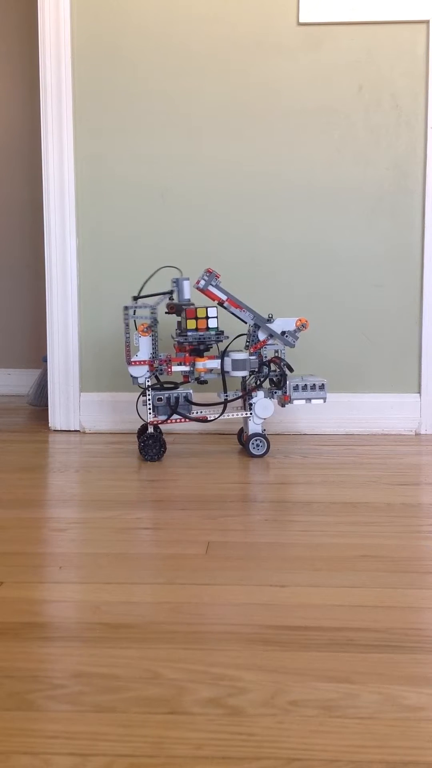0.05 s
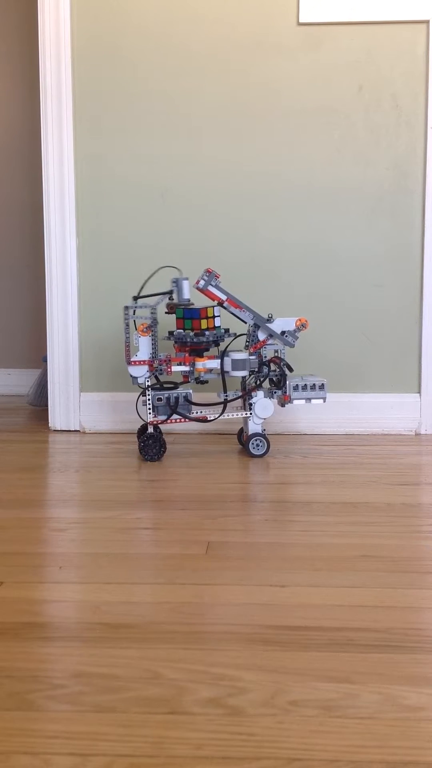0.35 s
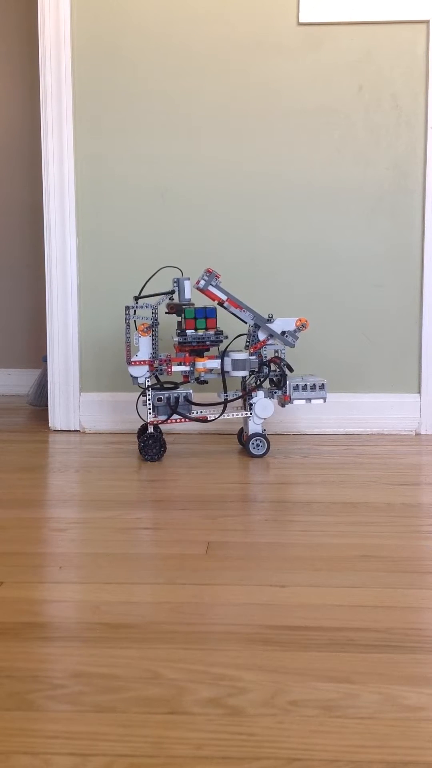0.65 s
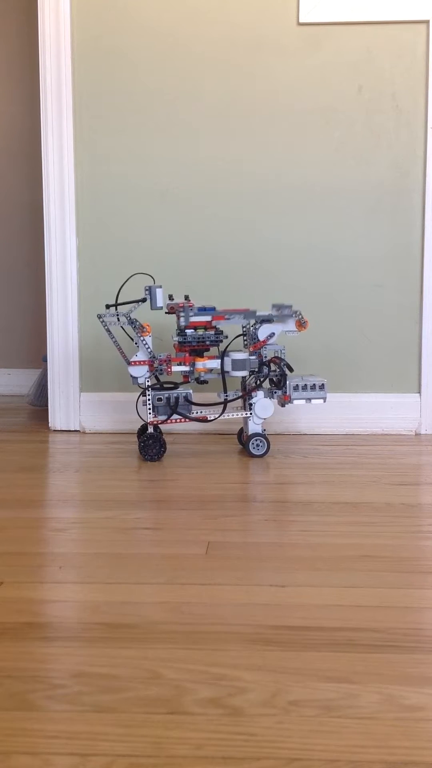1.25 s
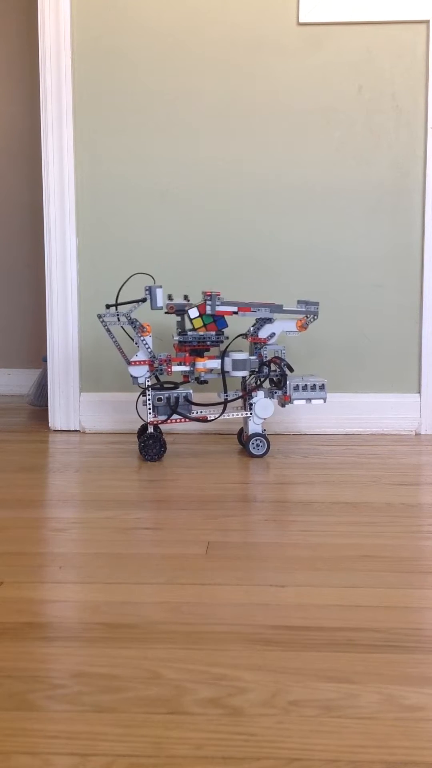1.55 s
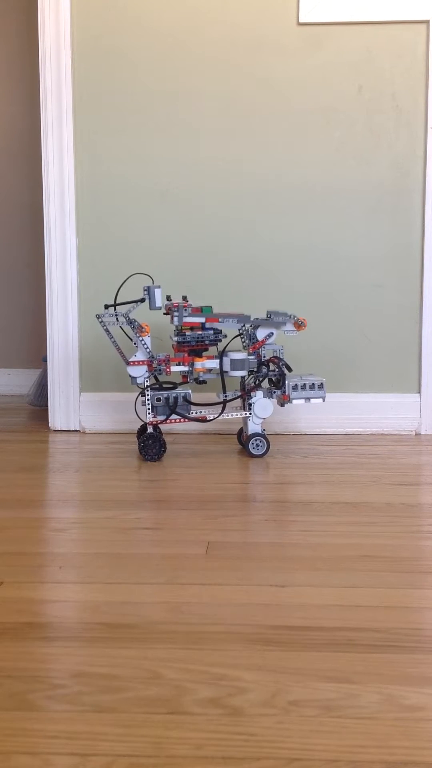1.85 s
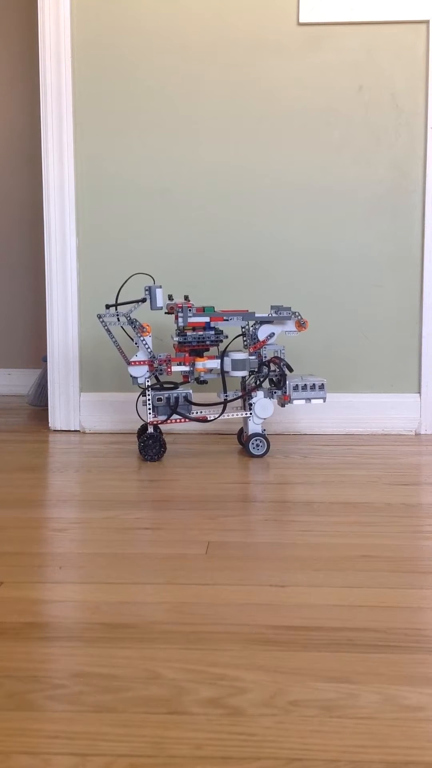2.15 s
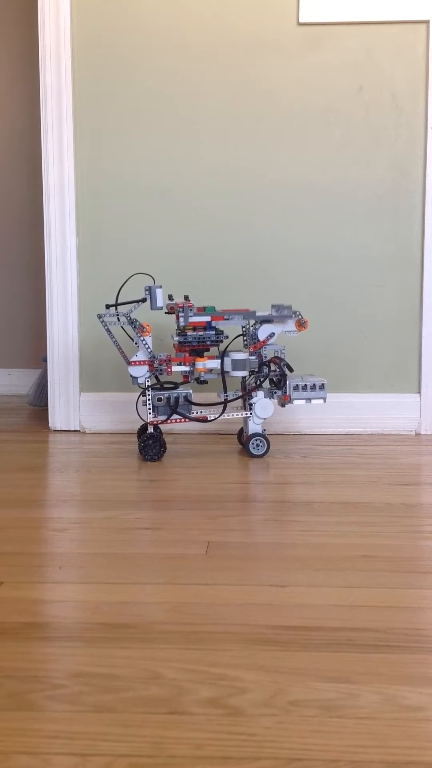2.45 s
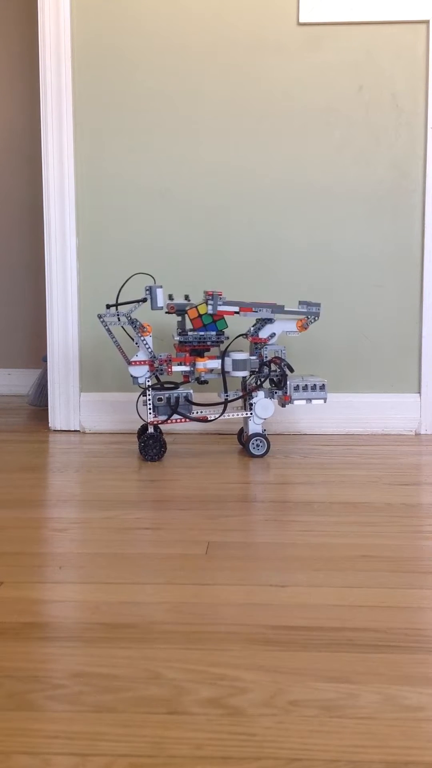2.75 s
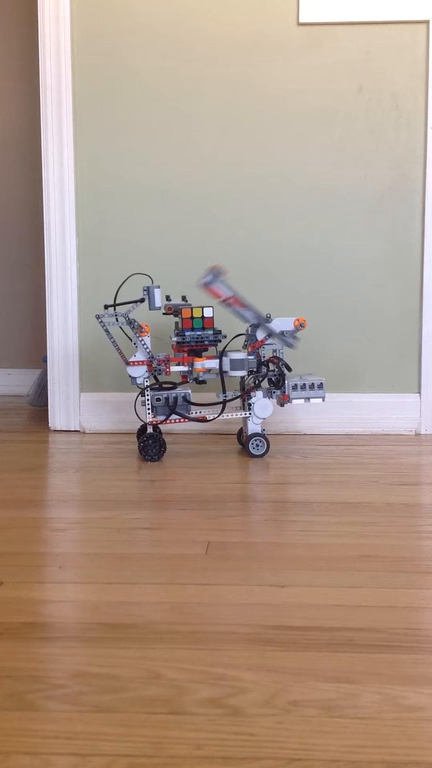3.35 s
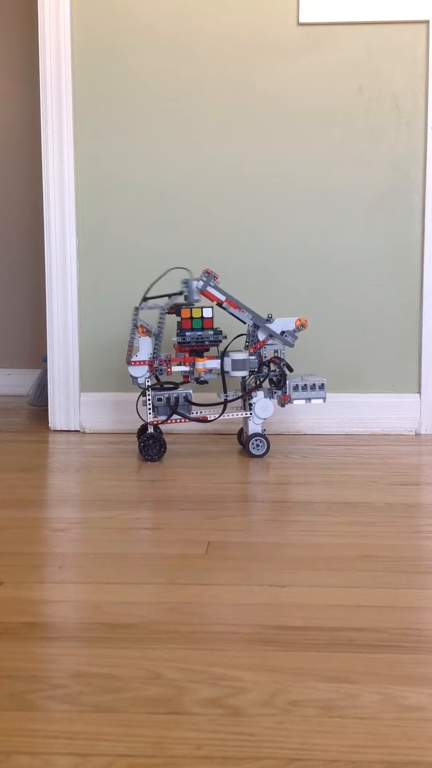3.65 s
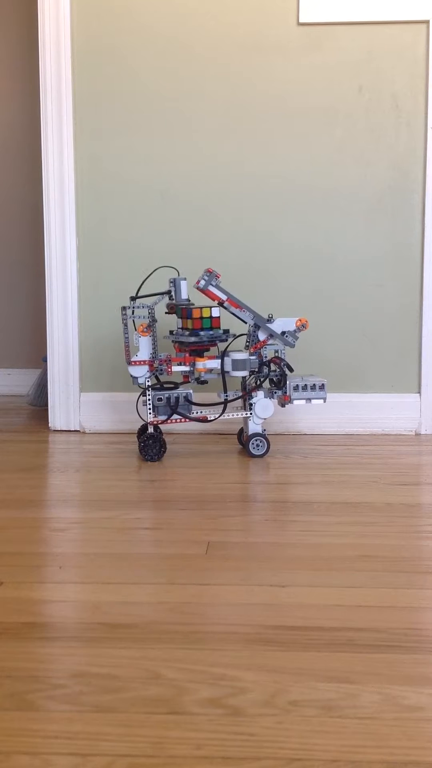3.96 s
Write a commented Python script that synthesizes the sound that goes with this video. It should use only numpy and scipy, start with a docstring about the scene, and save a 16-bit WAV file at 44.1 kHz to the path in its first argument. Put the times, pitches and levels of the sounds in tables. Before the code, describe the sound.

A toy robot's small motors and plastic gears rasp and whir in short bursts from the start. Near 0.9 seconds its arm clacks sharply onto a puzzle cube, followed by light ticks and more whirring. After a pause from 2 to 2.5 seconds, the bursts return with lighter knocks. Faint high squeaks join around 3.5 seconds, then one last whir. The slightly echoing room hums quietly underneath.

```python
"""A toy-brick robot handles a puzzle cube on the wooden floor of a bare, humming room.
First its turntable turns: a small motor speeds up and brakes, and plastic gear teeth rasp and whine.
From 0.7 s a second motor tilts the arm, which clacks down on the cube; loose parts tick.
After a pause at 2 s the arm moves and knocks again. Near 3.5 s a third motor moves the sensor arm
on its squeaky axle, and at the end the turntable starts once more."""
import sys
import numpy as np
from scipy import signal
from scipy.fft import rfft, irfft, next_fast_len
from scipy.io import wavfile

SR = 44100
rng = np.random.default_rng(int(sys.argv[2]) if len(sys.argv) > 2 else 0)


def unload_wav(signal):
    """Save mono or channel-first audio to the path in sys.argv[1] as 16-bit WAV at rate SR, clipped to [-1, 1]."""
    wavfile.write(
        sys.argv[1],
        SR,
        np.round(np.clip(np.atleast_2d(signal).T, -1, 1) * 32767).astype(np.int16),
    )


N = 176400

# the room's steady rush: f/Hz, relative level/dB
RUSH_SPECTRUM = [(30, -34), (55, -37), (90, -16.5), (112, -6.5), (155, -.5), (200, -1), (250, 0), (300, -5),
                 (390, -5.5), (520, -10.5), (800, -13), (1550, -24), (4000, -30), (15500, -32)]
# how long the room's echo takes to fade by 60 dB: f/Hz, fade time/s
ECHO_FADE = [(500, 0.78), (3000, 0.6), (7000, 0.52), (14000, 0.29)]
# squeaks of the sensor arm's axle: t/s, length/s, level/dB, f/Hz
AXLE_SQUEAKS = [(3.504, 0.038, -39.5, 12150), (3.563, 0.051, -39, 14200), (3.678, 0.039, -43, 12250)]
# plastic knocks of arm and cube: t/s, level/dB, ring f/Hz, ring level relative to the knock/dB
KNOCKS = [(0.9371, -13.5, 5700, -13), (.9392, -12.5, 7800, -12), (0.946, -17, 13500, -6),
          (0.9515, -23, 5240, -19), (0.9604, -19, 5430, -11), (0.9702, -25, 13200, -8),
          (.980, -30, 10300, -9), (.8096, -24, 12400, -12), (1.0855, -30, 10800, -15.5),
          (1.119, -34, 7650, -23), (1.487, -30.5, 12040, -1.5), (2.560, -20, 10600, -12),
          (2.6977, -24, 12700, -12), (3.0145, -22, 8400, -14), (3.1098, -30.5, 5600, -4)]
# tone colour of the knocks: f/Hz, relative level/dB
KNOCK_SPECTRUM = [(100, -41), (500, -10), (1500, -6.5), (3000, -3), (5500, 2.5), (9500, 2.5), (13000, 6),
                  (15500, -4)]
# moves of each motor: t/s, spin-up/s, hold/s, braking/s, rasp level/dB, whine level/dB,
# tooth rate at full speed/Hz, treble boost/dB
TURNTABLE_RUNS = [(-.2, 0.086, 0.099, .07, -41, -62, 830, -1),
                  (.097, .015, .015, 0.055, -42.5, -61, 782, 0),
                  (.11, 0.11, 0.081, .07, -38.5, -53.5, 842.7, 2.5),
                  (.39, .1, .13, 0.078, -40.5, -58.5, 844, 2),
                  (3.81, 0.087, 0.14, .08, -38.5, -62, 833, 0.5)]
ARM_RUNS = [(.73, 0.073, 0.068, 0.12, -36, -61, 901, -5), (1.295, 0.074, 0.051, .17, -39.5, -46.5, 757, -3),
            (1.645, 0.057, .02, 0.058, -36, -55.5, 710, 0), (1.76, 0.045, 0.018, 0.05, -32.5, -65, 940, -2),
            (1.85, 0.043, .025, 0.06, -41, -68, 920, -2.5), (2.505, 0.076, 0.056, 0.15, -40, -48, 751, -6),
            (2.77, 0.042, 0.032, 0.06, -53.5, -79, 716, -4),
            (2.865, 0.046, 0.023, .07, -37.5, -59, 743, -3),
            (2.985, 0.034, 0.008, 0.073, -32.5, -42, 915, 1),
            (3.06, 0.046, 0.034, 0.087, -43, -59, 892, -4), (3.235, 0.091, 0.059, 0.039, -32, -49, 841, 1)]
SENSOR_RUNS = [(3.455, 0.067, .035, 0.069, -39.5, -50.5, 764, 0.11),
               (3.53, .08, .16, 0.033, -42, -55, 934, -0.66)]
# tone colour that each set of gears gives its tooth strikes: f/Hz, relative level/dB
TURNTABLE_SPECTRUM = [(100, -55), (500, -11), (1000, -16), (1400, -2.5), (1950, -10), (2500, -0.5),
                      (3500, -8), (5500, -2), (10500, -5), (13800, -2), (15500, -3.5)]
ARM_SPECTRUM = [(100, -44), (500, -15.5), (1000, -15.5), (1400, -8), (2100, -7.5), (3200, -6), (6000, -2),
                (8500, -4.5), (10500, -1), (12700, -3), (15500, -1.5)]
SENSOR_SPECTRUM = [(100, -53), (1000, -18), (1600, -5), (4000, -5.5), (7000, -4), (10800, -5),
                   (12200, -5.5), (13000, -2), (14200, -3), (15500, -3.5)]
# tones in the whine of each set of gears: multiple of the tooth rate, relative level/dB
TURNTABLE_TONES = [(2, 3.5), (3, 5.5), (6, 0)]
ARM_TONES = [(2, -2.5), (3, -6.5), (4, -3.5), (5, -5), (7, -8)]
SENSOR_TONES = [(2, 2.5), (3, -2.5), (8, 3)]

RUSH_DB, HUM_DB, HUM_HZ = -54.5, -64.5, 122.9
RASP_ECHO_DB, TONE_ECHO_DB, KNOCK_ECHO_DB = -3.5, -5.5, -1.5
CRACK_FADE_S, RING_FADE_S = 0.0089, 0.018  # time to fade by 60 dB
START_PITCH, BRAKE_SAG = 0.76, 0.1  # shares of the full-speed pitch
SPEED_WOBBLE, SQUEAK_WOBBLE = 0.01, 0.0092  # shares by which the pitch wanders
TOOTH_SPREAD_DB, TOOTH_RING_S = 3.5, 0.00076
CHATTER_DB, CHATTER_HZ = 0.94, 70.4  # quick flutter in a motor's loudness
RASP_POWER, WHINE_POWER, WHINE_BRAKE_POWER = 0.77, 2, 4.3  # higher: swells later, fades sooner
PATCH_DB, PATCH_WIDTH_HZ, PATCH_S = 2.5, 430, 0.029  # depth, width and length of gear resonances


def from_db(db):
    """Turn decibels into a factor to multiply by."""
    return 10 ** (np.asarray(db) / 20)


def rms_one(x):
    """Scale a signal so that its average power is one."""
    return x / np.sqrt(np.mean(x ** 2) + 1e-20)


def at_hz(points, hz):
    """Read between a table's rows, with every octave equally wide."""
    f, value = np.transpose(points)
    return np.interp(np.log(np.maximum(hz, 1)), np.log(f), value)


def colour(x, spectrum):
    """Give a signal a tone colour; white noise keeps its power."""
    size = next_fast_len(len(x) + SR // 10)
    gain = rms_one(from_db(at_hz(spectrum, np.fft.rfftfreq(size, 1 / SR))))
    return irfft(rfft(x, size) * gain, size)[:len(x)]


def drift(rate_hz, size):
    """A smooth random wobble with a typical size of one."""
    r, run_in = np.exp(-2 * np.pi * rate_hz / SR), SR // 10
    smooth = signal.lfilter([1], [1, -2 * r, r * r], rng.standard_normal(size + run_in))
    return rms_one(smooth[run_in:])


def add(out, start, x):
    """Mix a sound in at a start time in seconds."""
    i = int(start * SR)
    x = x[max(-i, 0):N - i]
    out[max(i, 0):max(i, 0) + len(x)] += x


def room_tone():
    """The background: a low, steady rush and the hum of mains power."""
    rush = colour(rng.standard_normal(N), RUSH_SPECTRUM)
    hum = np.sqrt(2) * np.sin(2 * np.pi * HUM_HZ * np.arange(N) / SR)
    return from_db(RUSH_DB) * rush + from_db(HUM_DB) * hum


def room_echo(build_up_s=0.0013):
    """The room's answer to a click, different for each position of the source; treble dies first."""
    t, tail = np.arange(SR * 2 // 3) / SR, 0
    noise, edges_hz = rng.standard_normal((2, len(t))), np.geomspace(200, 18000, 11)
    for k, (low, high) in enumerate(zip(edges_hz, edges_hz[1:])):
        band = signal.sosfilt(signal.butter(2, [low, high], "band", fs=SR, output="sos"), noise[k % 2])
        tail = tail + band * from_db(-60 * t / at_hz(ECHO_FADE, np.sqrt(low * high)))
    tail = tail * (1 - np.exp(-t / build_up_s))
    return tail / np.sqrt(np.sum(tail ** 2))


def squeaks():
    """A dry axle sings briefly on a high, unsteady tone."""
    out, t = np.zeros(N), np.arange(SR // 10) / SR
    for start, length, db, hz in AXLE_SQUEAKS:
        cycles = np.cumsum(hz * (1 + SQUEAK_WOBBLE * drift(rate_hz=80, size=len(t)))) / SR
        swell = np.sin(np.pi * np.minimum(t / length, 1))
        add(out, start, from_db(db) * swell * np.sin(2 * np.pi * cycles))
    return out + from_db(TONE_ECHO_DB) * signal.fftconvolve(out, room_echo())[:N]


def knocks():
    """The brick frame gives a sharp crack that echoes, and the part that was hit rings briefly."""
    out, t = np.zeros(N), np.arange(SR // 10) / SR
    for start, db, ring_hz, ring_db in KNOCKS:
        crack = rng.standard_normal(len(t)) * from_db(db - 60 * t / CRACK_FADE_S) / 2
        ring = np.sin(2 * np.pi * ring_hz * t) * from_db(db + ring_db - 60 * t / RING_FADE_S)
        add(out, start, crack + ring)
        add(out, start, from_db(KNOCK_ECHO_DB) * np.sqrt(np.sum(crack ** 2)) * room_echo())
    return colour(out, KNOCK_SPECTRUM)


def gear_resonances(x, size=256):
    """Narrow bands of the sound swell and fade at random as the contact moves round the gears."""
    _, _, frames = signal.stft(x, SR, nperseg=size)
    patches = rng.standard_normal(frames.shape)
    # smooth the random patches across frequency, then across time
    for axis, steps in enumerate((PATCH_WIDTH_HZ * size / SR, PATCH_S * SR / (size / 2))):
        r = np.exp(-2 / steps)
        patches = signal.lfilter([1], [1, -2 * r, r * r], patches, axis=axis)
    _, shaped = signal.istft(frames * from_db(PATCH_DB * rms_one(patches)), SR, nperseg=size)
    return rms_one(shaped[:len(x)])


def motor(moves, spectrum, tones):
    """Gear teeth strike unevenly, hiss as they slide, and whine; the pitch climbs until braking."""
    t, out = np.arange(SR // 2) / SR, np.zeros(N)
    for start, spin_up, hold, braking, rasp_db, whine_db, tooth_hz, treble_db in moves:
        climb = np.sin(np.clip(t / (spin_up + hold), 0, 1) * np.pi / 2)
        brake = np.clip((t - spin_up - hold) / braking, 0, 1)
        drive = np.minimum(t / spin_up, 1 - brake)
        pitch = tooth_hz * (START_PITCH + (1 - START_PITCH) * climb - BRAKE_SAG * brake)
        teeth_passed = np.cumsum(pitch * (1 + SPEED_WOBBLE * drift(rate_hz=40, size=len(t)))) / SR
        tooth = teeth_passed.astype(int)
        since_strike_s = (teeth_passed - tooth) / pitch
        strength = from_db(TOOTH_SPREAD_DB * rng.standard_normal(len(t)))[tooth]
        strikes = rms_one(strength * np.exp(-since_strike_s / TOOTH_RING_S))
        scrape = rms_one((strikes + 1) * rng.standard_normal(len(t)))  # the 1 is the sliding hiss
        scrape = colour(gear_resonances(scrape), spectrum)
        scrape = colour(scrape, [(11300, 0), (13300, treble_db)])  # each move has its own brightness
        gear_tone = rms_one(sum(from_db(db) * np.sin(2 * np.pi * k * teeth_passed) for k, db in tones))
        chatter_db = CHATTER_DB * drift(CHATTER_HZ, size=len(t))
        rasp = from_db(rasp_db + chatter_db) * drive ** RASP_POWER * scrape
        whine_swell = np.minimum(t / spin_up, 1) ** WHINE_POWER * (1 - brake) ** WHINE_BRAKE_POWER
        whine = from_db(whine_db + chatter_db) * whine_swell * gear_tone
        into_room = from_db(RASP_ECHO_DB) * rasp + from_db(TONE_ECHO_DB) * whine
        add(out, start, rasp + whine)
        add(out, start, signal.fftconvolve(into_room, room_echo()))
    return out


def scene():
    """Three motors, knocks, squeaks and the room's own sound, mixed into one channel."""
    turntable = motor(TURNTABLE_RUNS, TURNTABLE_SPECTRUM, TURNTABLE_TONES)
    arm = motor(ARM_RUNS, ARM_SPECTRUM, ARM_TONES)
    sensor_arm = motor(SENSOR_RUNS, SENSOR_SPECTRUM, SENSOR_TONES)
    return (turntable + arm + sensor_arm + knocks() + squeaks() + room_tone())[None]


def record(dry):
    """Treble above 15280 Hz is cut away steeply."""
    return signal.sosfilt(signal.ellip(12, .2, 80, 15280, fs=SR, output="sos"), dry)


dry = scene()
out = record(dry)
unload_wav(out)
```